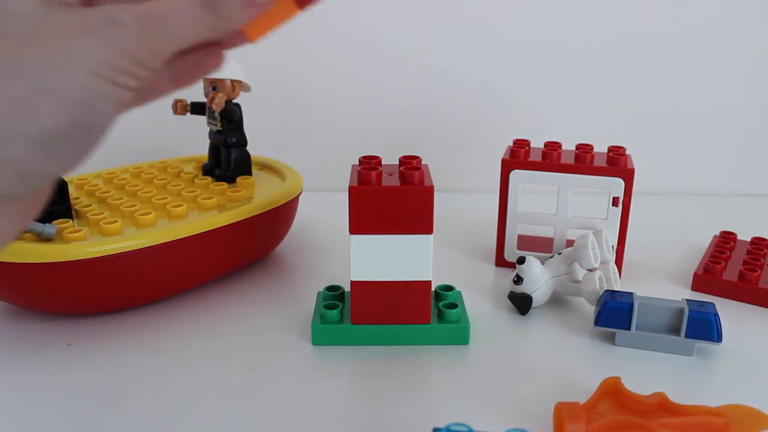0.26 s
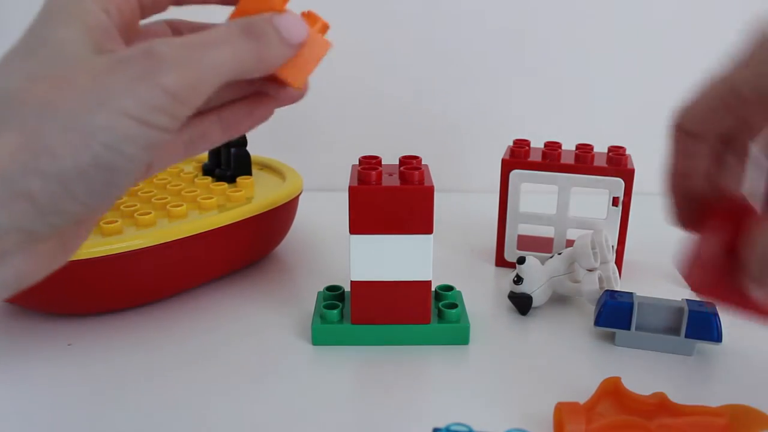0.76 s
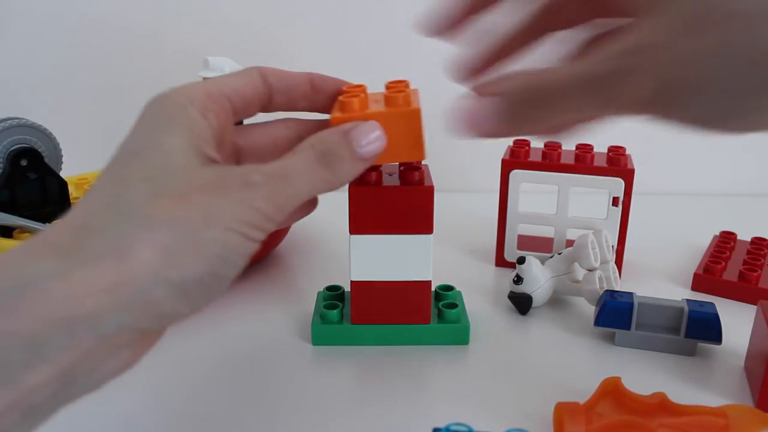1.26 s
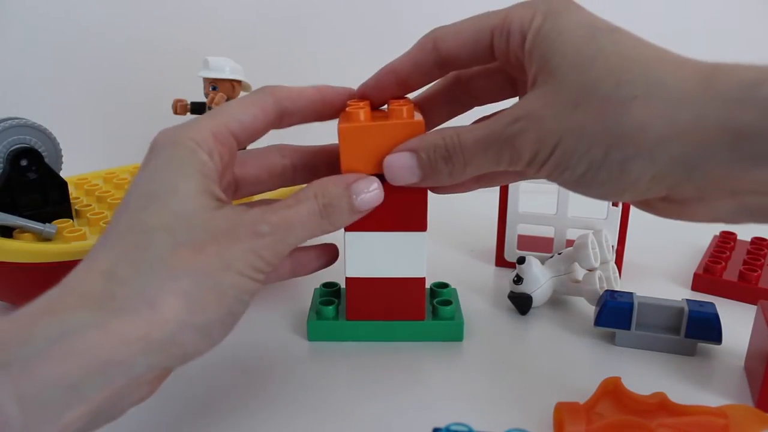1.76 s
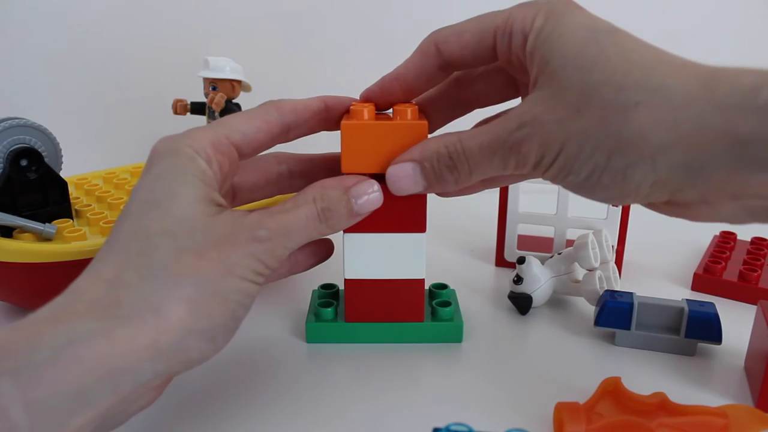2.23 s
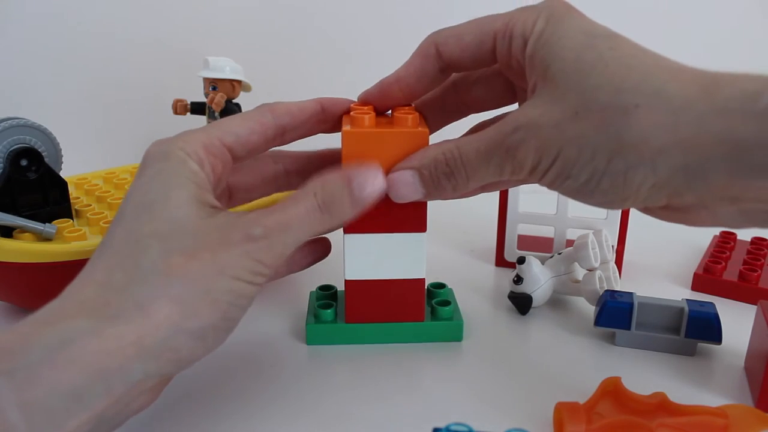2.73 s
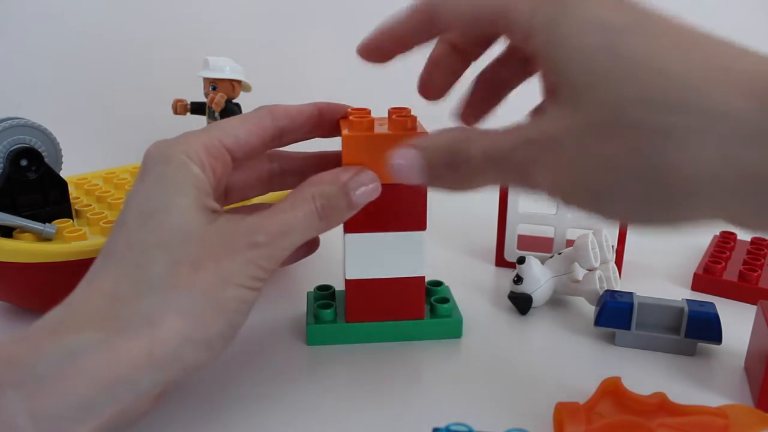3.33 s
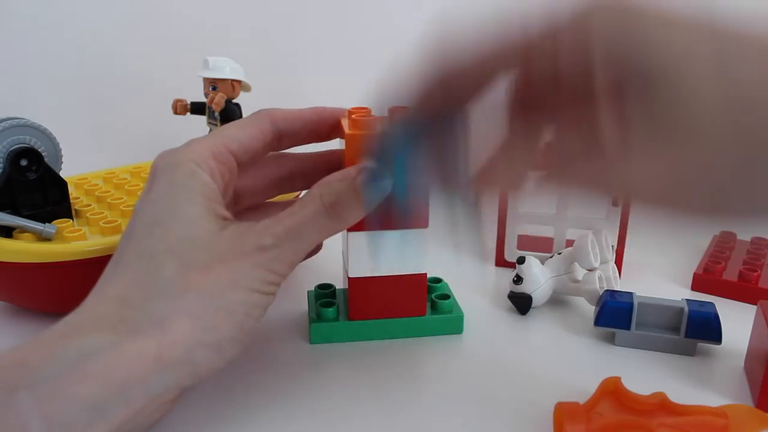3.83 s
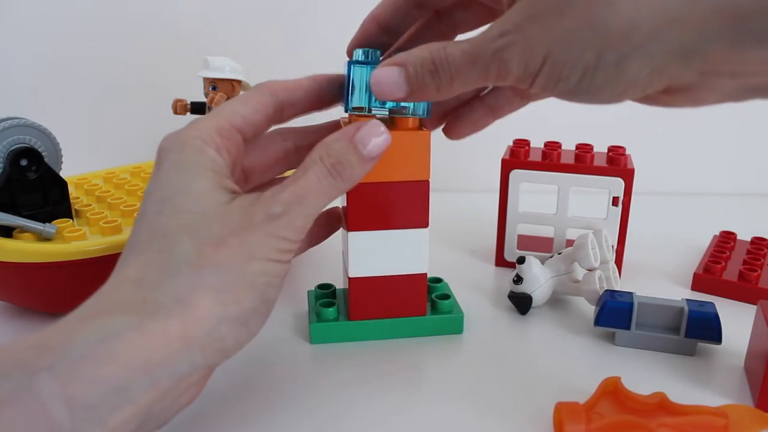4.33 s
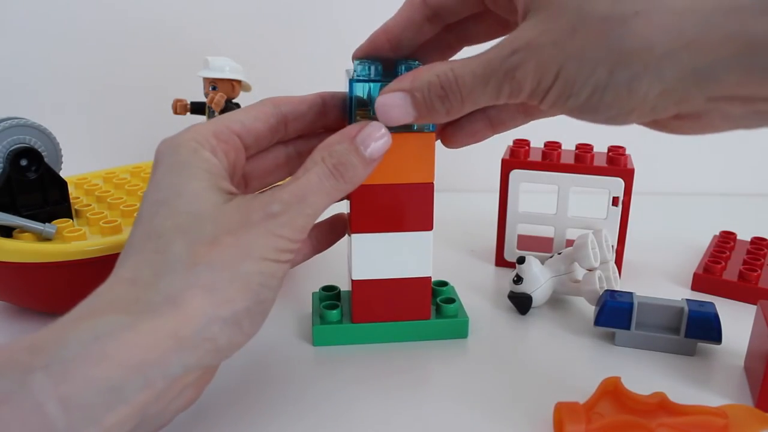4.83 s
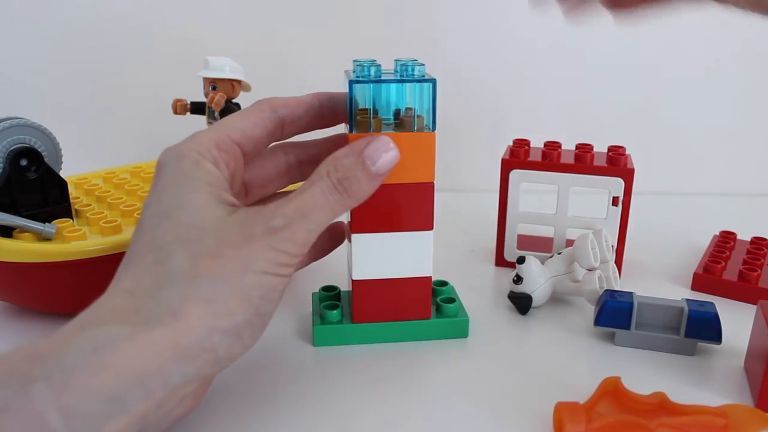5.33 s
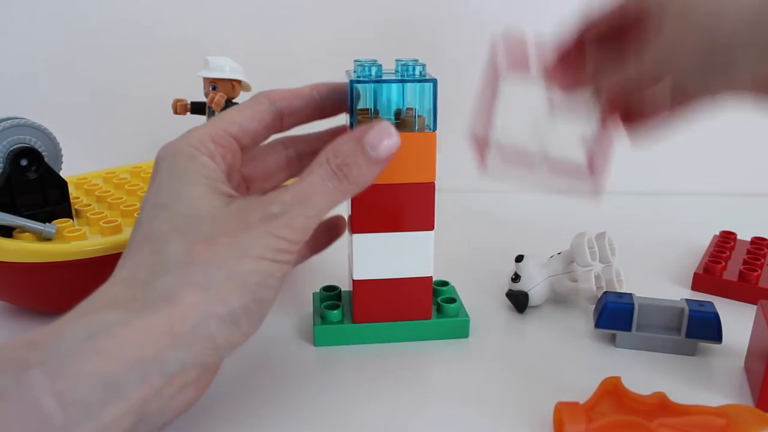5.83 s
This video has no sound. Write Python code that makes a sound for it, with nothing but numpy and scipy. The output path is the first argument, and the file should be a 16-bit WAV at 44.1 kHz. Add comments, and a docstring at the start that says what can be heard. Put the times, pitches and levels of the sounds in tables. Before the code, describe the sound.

Hollow plastic toy bricks click, knock and press together on a tabletop in a quiet, bare room, with two sharp clacks early on.

```python
"""A quiet, bare room with a table, hollow plastic toy bricks handled close to the microphone; steady floor.
Light ticks, then a small piece clacks as it is picked up and a large one lands, edge first, then flat.
Bricks knock, press and slip on a tower, one is picked up, a forearm rumbles faintly and fingers slide and let go.
Near the end a toy window frame drags over the table, ticking on it, and ticks once more at the last.
Contacts are decaying modes plus noise chatter, rubbing is shaped noise; a near wall and the room answer."""
import sys
import numpy as np
from scipy import signal
from scipy.fft import rfft, irfft
from scipy.io import wavfile

SR = 44100
rng = np.random.default_rng(int(sys.argv[2]) if len(sys.argv) > 2 else 0)


def dump_mix(stems):
    """Bounce the given channels to the path in sys.argv[1] as a 16-bit WAV at rate SR."""
    frames = np.atleast_2d(stems).T  # one column per channel
    limited = np.clip(frames, -1, 1)  # hard clip at full scale
    pcm = np.round(limited * 32767).astype(np.int16)
    wavfile.write(sys.argv[1], SR, pcm)


N = 268128  # length in samples
TAPS = 4096  # length of one contact and of the filter design, in samples


def amp(db):
    """Decibels to gain."""
    return 10 ** (np.asarray(db) / 20)


def unit(x):
    """Scales to an rms of one."""
    return x / np.sqrt(np.mean(x ** 2) + 1e-20)


def read(points, hz):
    """Reads a (Hz, value) table on a log-frequency axis."""
    f, value = np.transpose(points)
    return np.interp(np.log(hz + 1), np.log(f + 1), value)


def add(mix, s, sound):
    """Mixes a sound in at time s, in seconds."""
    part = mix[round(s * SR):][:len(sound)]
    part += sound[:len(part)]


def colour(x, points):
    """Causal minimum-phase filter with the given (Hz, dB) curve, so that attacks stay sharp."""
    hz = abs(np.fft.fftfreq(TAPS, 1 / SR))
    log_gain = np.log(amp(read(points, hz)))
    response = np.fft.ifft(np.exp(np.conj(signal.hilbert(log_gain)))).real
    return signal.fftconvolve(x, response[:TAPS // 2])[:len(x)]


# Room tone and microphone hiss. Each row: frequency in Hz, relative level in dB per Hz.
FLOOR_COLOUR = [(12, -39.5), (20, -1.5), (95, -3), (153, -3.5), (196, -4.5), (238, -0.5), (298, -3.5),
                (404, -1), (667, -7), (834, -6), (1270, -8.5), (1820, -10.5), (2610, -11.5), (4070, -15),
                (15500, -27.5)]
FLOOR_DB = -52.5  # rms


def room_floor():
    """Room tone and microphone hiss: steady noise given its spectrum bin by bin."""
    gain = amp(read(FLOOR_COLOUR, np.fft.rfftfreq(N, 1 / SR)))
    return amp(FLOOR_DB) * unit(irfft(rfft(rng.standard_normal(N)) * gain, N))


# How long the bare room rings. Each row: frequency in Hz, t60 in seconds.
ROOM_T60 = [(140, 0.33), (400, 1.2), (1200, 1), (3000, 0.87), (6000, 0.87), (10000, 0.84), (15000, 0.14)]
# The colour of its tail. Each row: frequency in Hz, gain in dB.
ROOM_COLOUR = [(80, -3.5), (120, 2), (148, 14), (180, 0.5), (235, 1.5), (450, 0), (700, 0.5), (900, 0.5),
               (1200, 4), (3000, -1.5), (6000, -4), (10000, -5.5), (15000, -1)]


def room(x, gap=0.0057, build=0.0013):
    """A diffuse tail that builds up after a short gap (both in s), each band dying at its own speed."""
    hz, t, bands = signal.stft(rng.standard_normal(SR), SR, nperseg=256)
    decay = amp(-60 * t / read(ROOM_T60, hz)[:, None])
    tail = signal.istft(bands * decay, SR, nperseg=256)[1][:SR]
    tail *= 1 - np.exp(-np.maximum(np.arange(SR) / SR - gap, 0) / build)
    tail = colour(tail / np.linalg.norm(tail), ROOM_COLOUR)
    return signal.fftconvolve(x, tail)[:N]


def near_wall(x, wall_db, delay=.0067, dull_hz=2200):
    """Sound bounces back from a near wall, twice, later (delay in s) and duller each time."""
    out, echo = x.copy(), x
    b, a = signal.butter(1, dull_hz, fs=SR)
    for bounce in (1, 2):
        echo = amp(wall_db) * signal.lfilter(b, a, echo)
        add(out, bounce * delay, echo)
    return out


def rub(strokes, spectrum, slips_per_s, smooth):
    """Friction: many tiny slips of uneven size over a smooth hiss; each stroke swells and fades like a bell curve."""
    slips = (rng.random(N) < slips_per_s / SR) * rng.standard_normal(N)
    drive = unit(slips) + smooth * rng.standard_normal(N)
    t = np.arange(N) / SR
    pressure = sum(amp(db) * np.exp(-(2 * (t - middle) / length) ** 2) for middle, length, db in strokes)
    return unit(colour(drive, spectrum)) * pressure


# A forearm shifts on the table. Each row: middle in seconds, length in seconds, level in dB.
LEAN = [(3.75, 0.69, -56.5)]
# The colour of its rumble. Each row: frequency in Hz, relative level in dB per Hz.
LEAN_COLOUR = [(20, -24), (42, -14), (54, 10), (70, -10), (120, -31), (400, -53), (2000, -79)]


def forearm_rumble():
    """A forearm on the table rubs with sparse slips, filtered to a faint low rumble."""
    return rub(LEAN, LEAN_COLOUR, slips_per_s=380, smooth=1.8)


# Fingers slide over smooth plastic. Each row: middle in seconds, length in seconds, level in dB.
SLIDE = [(4.075, 0.12, -54.5), (5.205, .05, -61)]
# The colour of the slide. Each row: frequency in Hz, relative level in dB per Hz.
SLIDE_COLOUR = [(500, -14.5), (2000, -2), (4500, 4), (10000, -10), (15000, -9)]


def finger_slide():
    """Skin on smooth plastic: dense slips under a strong hiss, bright in colour."""
    return rub(SLIDE, SLIDE_COLOUR, slips_per_s=1300, smooth=1.5)


# The window frame drags over the table. Each row: middle in seconds, length in seconds, level in dB.
DRAG = [(5.632, 0.025, -52), (5.695, 0.061, -41.5), (5.75, 0.034, -47), (5.836, 0.02, -45.5)]
# The colour of the drag. Each row: frequency in Hz, relative level in dB per Hz.
DRAG_COLOUR = [(100, -33.5), (300, -17), (480, 1.5), (650, -1), (830, -1.5), (1100, -21), (2600, -17),
               (4500, -30), (12000, -44)]


def frame_drag():
    """Plastic on table: dense slips and hiss, strongest in the low middle."""
    return rub(DRAG, DRAG_COLOUR, slips_per_s=1100, smooth=1.1)


# Edges, in Hz, of the six registers of a contact: table thud, then the piece's knock, clop, clack, snap, tick.
REGISTERS = [60, 200, 700, 1400, 2300, 4600, 16000]
PIVOT_HZ = 1760  # a harder touch tilts the voice towards the treble about this pitch


def touch(voice, strength_db, hardness=0, thud_db=-73, walls_db=0):
    """Register levels of one contact: the table's thud, then the voice raised by strength and tilted by hardness.
    The side walls clack more where they are free, less where fingers hold them."""
    edges = np.array(REGISTERS[1:])
    octaves = np.log2(np.sqrt(edges[1:] * edges[:-1]) / PIVOT_HZ)
    knock, clop, clack, snap, tick = np.array(voice) + strength_db + hardness * octaves
    return np.array([thud_db, knock, clop, clack + walls_db, snap, tick])


def weigh(x, levels_db):
    """Brings each register of a contact near its level, counted as rms over 20 ms."""
    hz, edges = np.fft.rfftfreq(TAPS, 1 / SR), np.array(REGISTERS)
    centres = np.sqrt(edges[1:] * edges[:-1])
    for _ in range(2):  # the second pass corrects for overlap between registers
        power = abs(rfft(x)) ** 2 * 2 / TAPS / (.02 * SR)
        held = np.add.reduceat(power, np.searchsorted(hz, edges))[:-1]
        gain_db = levels_db - 10 * np.log10(held + 1e-20)
        x = colour(x, np.column_stack([centres, gain_db]))
    return x


# Bright chatter of hard edges meeting. Each row: frequency in Hz, relative level in dB.
CHATTER = [(100, -16), (250, -9), (600, -5.5), (1500, -2), (3000, 3.5), (5000, -2.5), (7000, -4),
           (10000, -10), (15000, -15)]


def shell_curve(modes, between_db, air_db, spread=1.2):
    """The smooth outline of a piece's resonances as (Hz, dB); air_db is added at the very top."""
    hz, db, t60 = np.transpose(modes)[:, :, None]
    grid = np.geomspace(60, 16000, 300)
    half_width = spread * np.log(1000) / (2 * np.pi * t60)  # Hz; a short ring makes a broad peak
    peaks = (amp(db) ** 2 / (1 + ((grid - hz) / half_width) ** 2)).sum(0)
    between = amp(between_db + read(CHATTER, grid)) ** 2
    air = read([(6000, 0), (14000, air_db)], grid)
    return np.column_stack([grid, 10 * np.log10(peaks + between) + air])


# The table under every contact. Each row: frequency in Hz, relative level in dB, t60 in seconds.
TABLE = [(92, 3.5, 0.06), (134, 1.5, 0.064), (241.8, 2.5, .04)]


def contacts(rows, voice, modes, stud_hz, chatter_t60, send_db, chatter_db, between_db, air_db, grip_hz,
             rise, wall_db, stud_db, stud_t60=0.022, swell_cycles=0.85, room_ring_db=-6, bass_hz=80):
    """Each contact rings the piece and the table while the edges chatter; returns direct sound and room send."""
    t = np.arange(TAPS) / SR
    hz, db, t60 = np.transpose(TABLE + modes)[:, :, None]
    decay = amp(db - 60 * t / t60)
    swell = 1 - np.exp(-t * hz / swell_cycles)  # low modes take longer to build up
    attack = 1 - np.exp(-t / rise)  # rise in s
    shell = shell_curve(modes, between_db, air_db)
    # small things give off no deep bass
    radiation = signal.butter(3, bass_hz, "highpass", fs=SR, output="sos")
    direct, send = np.zeros(N), np.zeros(N)
    for s, *blow in rows:
        levels_db = touch(voice, *blow)
        shift = grip_hz * rng.standard_normal(hz.shape)  # every contact shifts the modes a little
        ring = (decay * swell * np.sin(2 * np.pi * (hz + shift) * t)).sum(0)
        stud = amp(stud_db - 60 * t / stud_t60) * np.sin(2 * np.pi * stud_hz * t)
        chatter = unit(colour(rng.standard_normal(2 * TAPS), shell)[TAPS:])
        chatter *= amp(chatter_db - 60 * t / chatter_t60)
        parts = np.array([ring, stud, chatter]) * attack
        ring, stud, chatter = signal.sosfilt(radiation, parts)
        add(direct, s, weigh(near_wall(ring + stud + chatter, wall_db), levels_db))
        # the room gathers sound from all sides of the piece, so single modes stand out less
        add(send, s, weigh(amp(room_ring_db) * ring + chatter, levels_db + send_db))
    return np.array([direct, send])


# Light ticks of fingers and pieces; the last, at 6.064, is the window frame.
# Each row: start in seconds, strength in dB, hardness in dB per octave.
TICKS = [(0.033, -54, 2), (0.04, -54, 2.5), (0.0485, -59, 4), (0.154, -58.5, 1.5), (0.171, -63, 0),
         (0.588, -43.5, -0.5), (2.0744, -49, -4), (2.213, -49, -8.5), (5.168, -60.5, 1), (6.064, -52, -4.5)]
# Voice before strength and hardness: knock, clop, clack, snap and tick, all in dB.
TICK_VOICE = (-21.5, -16, -8, -1.5, -0.5)
# The small piece, also picked up below. Each row: frequency in Hz, relative level in dB, t60 in seconds.
SMALL_PIECE = [(378, -3, 0.04), (1250, -15, .02), (1944, -8, .026), (2045, -5, .026), (2276, 1.5, .023),
               (2657, 7, 0.015), (2880, -5.5, .02), (3567, -4, 0.011), (4210, -8, 0.02),
               (5440, -9.5, 0.017), (7250, -11, 0.00795), (9100, -16, 0.0047), (13600, -19, 0.008)]


def light_ticks():
    """Light ticks, all given the small piece's modes with very short chatter, mostly treble."""
    return contacts(TICKS, TICK_VOICE, SMALL_PIECE, stud_hz=6930, stud_db=-12, grip_hz=8, rise=.00045,
                    chatter_t60=0.0069, chatter_db=1.5, between_db=-15.0, air_db=12.0,
                    send_db=-10.0, wall_db=-8)


# Tight studs slip; at 5.732 the window frame ticks on the table.
# Each row: start in seconds, strength in dB, hardness in dB per octave, table thud in dB.
SLIPS = [(1.7815, -35.5, 0.7, -43.5), (2.1146, -45, -0.5, -55), (2.9356, -45.5, 2, -66),
         (3.0051, -42.5, 0.6, -62), (3.7494, -50, -3, -60), (4.525, -33.5, -.4, -84),
         (4.846, -53.5, 0.5, -70), (4.8674, -41.5, -0.2, -51), (5.732, -55, 2, -78)]
# Voice before strength and hardness: knock, clop, clack, snap and tick, all in dB.
SLIP_VOICE = (-0.5, -1.3, -1, -7, -11.5)
# The stacked tower; its modes also serve presses and knocks. Each row: frequency in Hz, relative level in dB,
# t60 in seconds.
TOWER = [(310.7, 7, 0.025), (429.6, 2, 0.029), (618, -3, 0.027), (718, -15.5, 0.049), (898, -3, 0.02),
         (1114, -11.5, 0.029), (1385, -11, 0.038), (1566, -8, 0.021), (2190, -6, 0.022), (2680, -4, 0.016),
         (2893, 0, 0.019), (3130, 0, 0.0074), (3400, -2, 0.0087), (3910, -3.5, 0.02), (5100, -19, 0.023),
         (5870, -9, 0.02), (6320, -11, 0.0084), (6660, -11.5, 0.015), (8300, -23, .03)]


def slips_and_frame_tick():
    """Dry clicks of slipping studs and one of the window frame, all given the tower's modes."""
    return contacts(SLIPS, SLIP_VOICE, TOWER, stud_hz=4840, stud_db=-8, grip_hz=13, rise=0.00081,
                    chatter_t60=0.045, chatter_db=4, between_db=2, air_db=-6, send_db=-11.5, wall_db=-10.5)


# Bricks are pressed on the tower; at 3.661 one is picked up from the table.
# Each row: start in seconds, strength in dB, hardness in dB per octave, table thud in dB.
PRESSES = [(2.2367, -29, 1.16, -36), (2.5537, -36.5, 0, -33), (3.311, -43, 0.5, -59),
           (3.322, -41.5, 1, -46.5), (3.661, -40, -2, -31), (4.5695, -28.5, 0.8, -36.5),
           (5.215, -46, 1, -49), (5.305, -65, -7.5, -45)]
# Voice before strength and hardness: knock, clop, clack, snap and tick, all in dB.
PRESS_VOICE = (1, -5, -16, -9.5, -12.5)


def presses_and_brick_pickup():
    """Presses and one pickup share the tower's modes, a slow rise and a voice heavy in knock."""
    return contacts(PRESSES, PRESS_VOICE, TOWER, stud_hz=8110, stud_db=-5, grip_hz=14, rise=0.0012,
                    chatter_t60=0.018, chatter_db=5, between_db=0.5, air_db=-2,
                    send_db=-10, wall_db=-8, room_ring_db=-7, bass_hz=56)


# Bricks knock on the tower; at 5.228 fingers let go with a soft thump. Each row: start in seconds,
# strength in dB, hardness in dB per octave, table thud in dB, free ring of the side walls in dB.
KNOCKS = [(1.5664, -26.5, .4, -44, -3.5), (1.5833, -19.5, -.5, -42.5, -4.5), (1.611, -34, 0.5, -50, 3),
          (1.657, -45, 1.5, -47, 9), (1.9184, -39.5, 0, -75, -7), (4.273, -28, 1.3, -47.5, 5),
          (4.3908, -26.5, -1, -47.5, -6.5), (4.551, -35.5, 2.5, -51, 0), (4.644, -39, 1, -42, -4),
          (5.228, -41, -3.5, -46, -0.5)]
# Voice before strength and hardness: knock, clop, clack, snap and tick, all in dB.
KNOCK_VOICE = (0.5, -10, -9, -3, -16.5)


def knocks_and_finger_release():
    """Knocks and one soft thump share the hollow stack's modes, with more of the ring sent to the room."""
    return contacts(KNOCKS, KNOCK_VOICE, TOWER, stud_hz=6190, stud_db=-6, grip_hz=15.3, rise=0.00049,
                    chatter_t60=0.039, chatter_db=-6, between_db=-6.5, air_db=2.5,
                    send_db=-11.5, wall_db=-7.5, room_ring_db=-2, bass_hz=90)


# The small piece is picked up. Each row: start in seconds, strength in dB, hardness in dB per octave,
# table thud in dB, free ring of the side walls in dB.
PICKUP = [(0.4073, -36, -3.5, -54.5, 6), (0.4167, -10.5, -0.5, -34.5, -3.5)]
# Voice before strength and hardness: knock, clop, clack, snap and tick, all in dB.
PICKUP_VOICE = (-21, -25, -6.5, -1, -11)


def small_piece_pickup():
    """The small piece clacks as it is picked up: short modes and short bright chatter."""
    return contacts(PICKUP, PICKUP_VOICE, SMALL_PIECE, stud_hz=7120, stud_db=-17, grip_hz=2.7, rise=0.00044,
                    chatter_t60=0.015, chatter_db=5.5, between_db=-15.0, air_db=11.5,
                    send_db=-12.5, wall_db=-14.5)


# The large piece lands on one edge, then flat. Each row: start in seconds, strength in dB,
# hardness in dB per octave, table thud in dB, free ring of the side walls in dB.
SET_DOWN = [(1.022, -17, -3, -40.5, 9.5), (1.0415, -7, -0.14, -34.5, -3)]
# Voice before strength and hardness: knock, clop, clack, snap and tick, all in dB.
SET_DOWN_VOICE = (-19.5, -12, -7.5, -2, -9)
# The large piece. Each row: frequency in Hz, relative level in dB, t60 in seconds.
LARGE_PIECE = [(396, 3, 0.037), (684, -3.5, 0.039), (1092, -4, 0.036), (1243, -6, 0.085), (1710, 2, 0.026),
               (1908, 0.5, 0.0287), (2360, -5.5, 0.062), (2640, -11, 0.044), (2980, -21.5, 0.08),
               (3428, -1.5, 0.039), (4276, -5.5, 0.039), (4600, -16, 0.07), (6300, -7, 0.035),
               (7010, -6.5, 0.036)]


def large_piece_set_down():
    """The large piece lands twice: a sharp attack, longer modes and a strong near-wall echo."""
    return contacts(SET_DOWN, SET_DOWN_VOICE, LARGE_PIECE, stud_hz=4970, stud_db=2.5, grip_hz=4.2, rise=.0001,
                    chatter_t60=0.038, chatter_db=4.5, between_db=-6.5, air_db=-9.5,
                    send_db=-8.0, wall_db=-6.5, room_ring_db=-7, bass_hz=110)


def scene():
    """The steady floor, all rubbing and contacts, and the room's answer."""
    rubbing = finger_slide() + frame_drag()
    tower_voiced = slips_and_frame_tick() + presses_and_brick_pickup() + knocks_and_finger_release()
    piece_voiced = light_ticks() + small_piece_pickup() + large_piece_set_down()
    direct, send = tower_voiced + piece_voiced
    wet = room(send + amp(-10.5) * rubbing)
    return (room_floor() + forearm_rumble() + rubbing + direct + wet)[None]


def record(dry, threshold_db=-4, squeeze=1.0, recovery_db_per_s=26, attack=0.016, ceiling=0.77):
    """Gain control dips after the loudest clacks, whose first peaks overload; then hiss and the band limit."""
    peak_db = 20 * np.log10(abs(dry[0]) + 1e-9)
    fall = np.arange(N) / SR * recovery_db_per_s
    held_db = np.maximum.accumulate(peak_db + fall) - fall  # peaks jump up, then sink steadily
    over_db = np.maximum(held_db - threshold_db, 0)
    lag = np.exp(-1 / (attack * SR))  # attack in s
    dip_db = squeeze * signal.lfilter([1 - lag], [1, -lag], over_db)
    limited = np.clip(dry / amp(dip_db), -ceiling, ceiling)
    limited = limited + amp(-62) * rng.standard_normal(N)  # the recorder's own hiss
    low_pass = signal.firwin(511, 15850, window=("kaiser", 8), fs=SR)  # edge in Hz
    return signal.oaconvolve(limited, low_pass[None], "same")


dry = scene()
out = record(dry)
dump_mix(out)
```